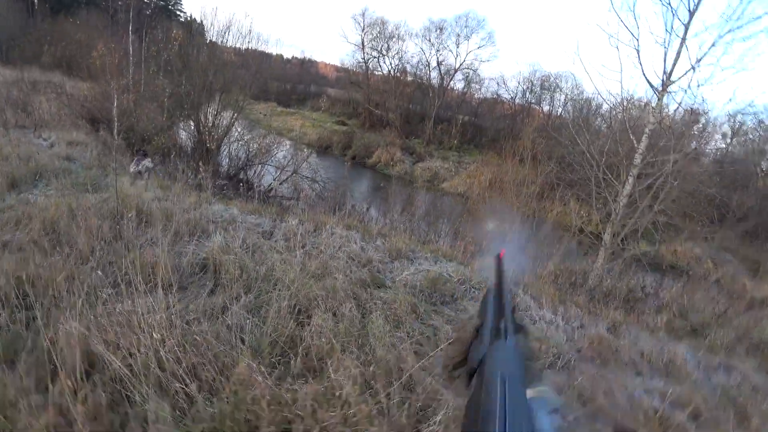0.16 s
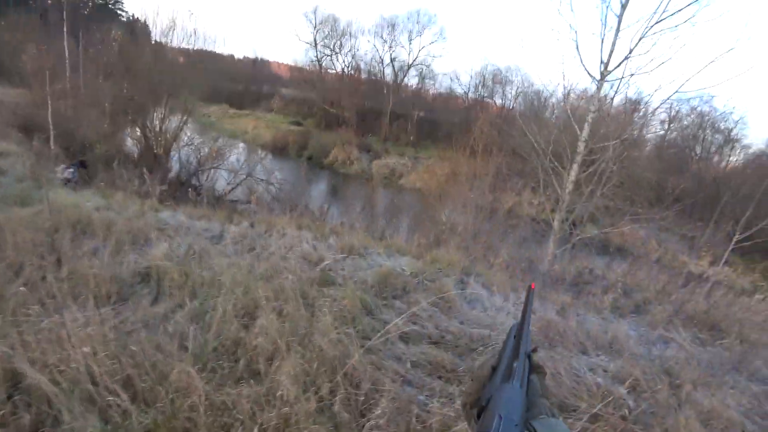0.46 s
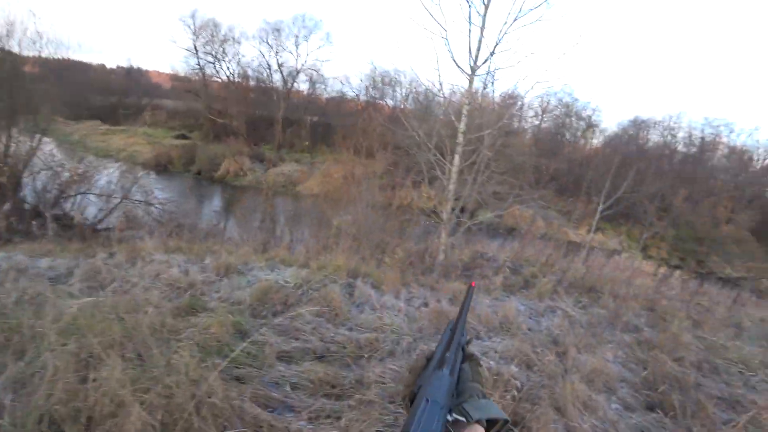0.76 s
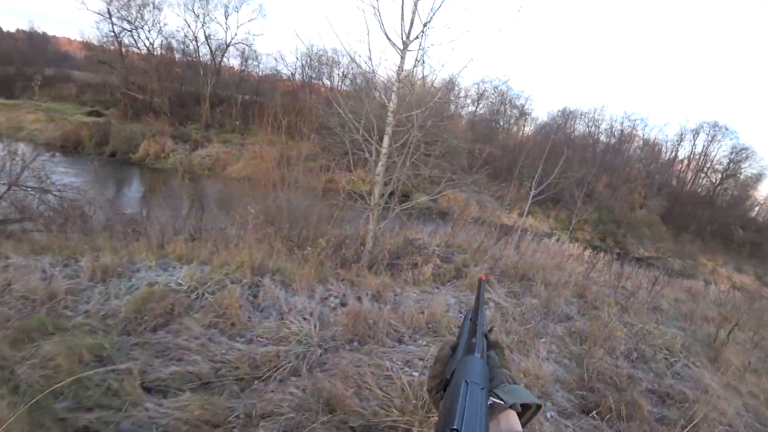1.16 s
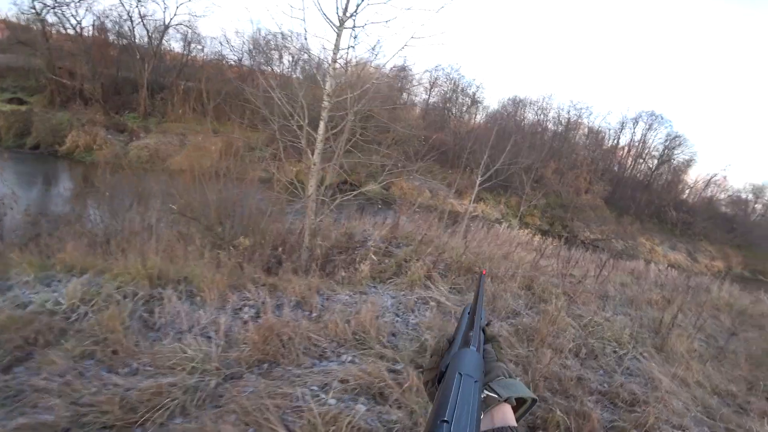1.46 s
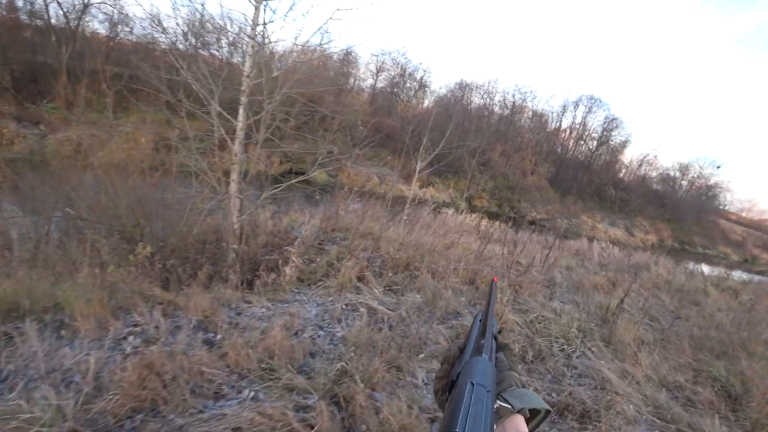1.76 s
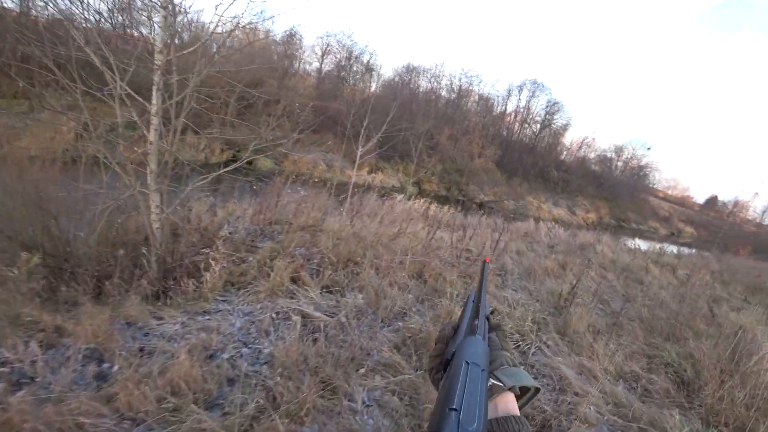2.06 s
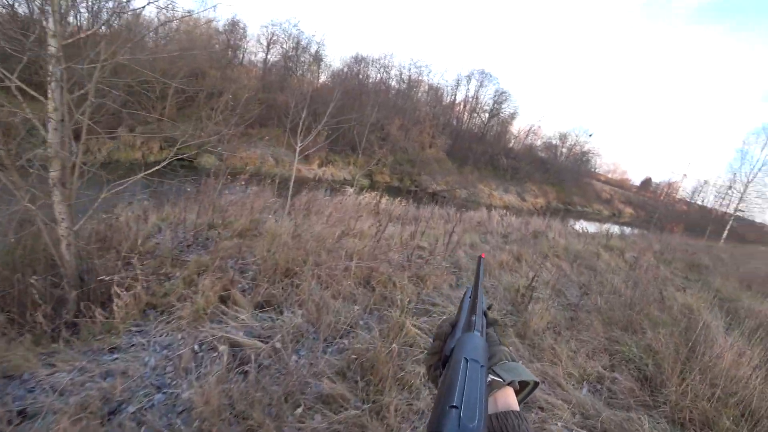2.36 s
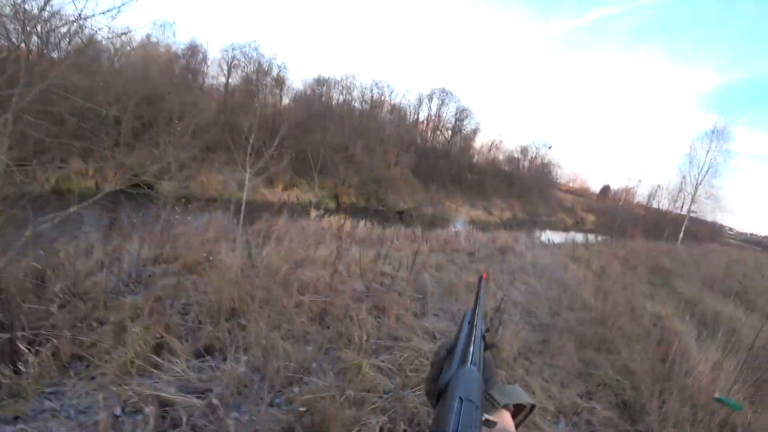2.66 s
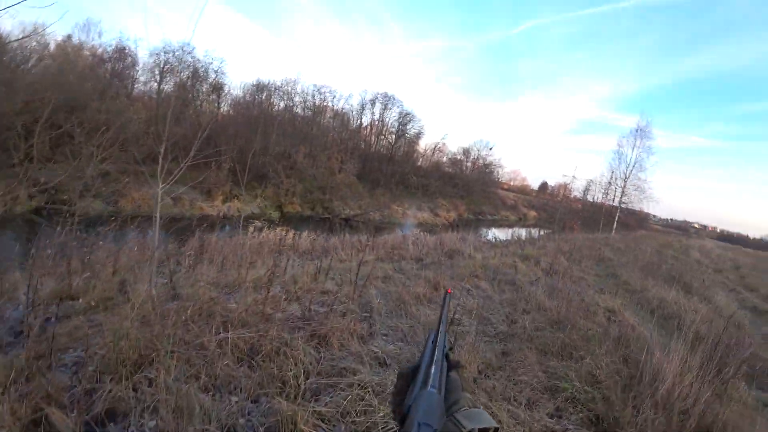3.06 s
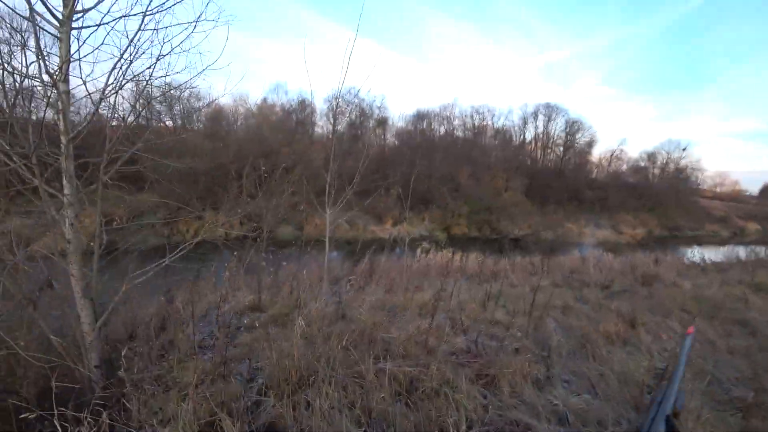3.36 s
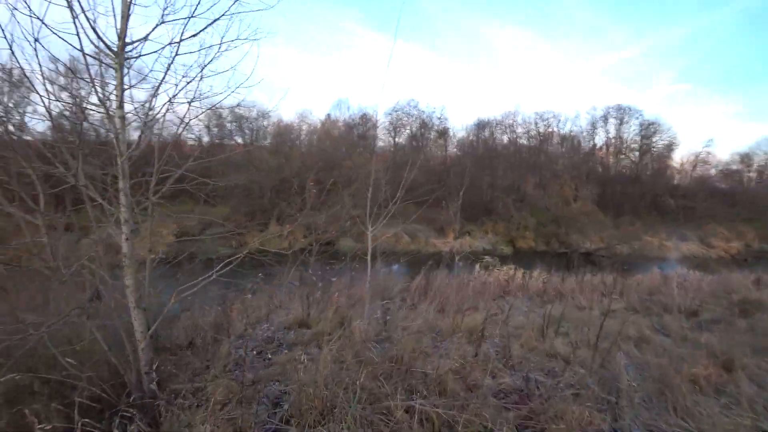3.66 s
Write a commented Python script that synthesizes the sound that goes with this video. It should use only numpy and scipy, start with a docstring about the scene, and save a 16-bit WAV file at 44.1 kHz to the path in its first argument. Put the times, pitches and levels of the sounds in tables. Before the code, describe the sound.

A self-loading shotgun fires twice on a brushy river bank, echoes slapping back and fading.

```python
"""A self-loading shotgun fires twice on a brushy river bank, heard from the shooter's head.
Each blast is banded noise with one steep low pressure swing; the bolt clatters after it as bright cracks.
Banks and tree lines roll the shot back: single dull slaps over clumped grains that lose treble as they fade.
Small hard things tick, filtered grains make clothing rustle over a faint hiss,
and low noise, partly opposed between the two microphones, makes the light wind buffet."""
import sys
import numpy as np
from scipy import signal
from scipy.io import wavfile
from scipy.ndimage import uniform_filter1d

SR = 44100
rng = np.random.default_rng(int(sys.argv[2]) if len(sys.argv) > 2 else 0)


def decibels_to_gain(level_db):
    """Convert a level in decibels to a linear amplitude gain (20 dB per decade)."""
    exponent = np.asarray(level_db, float) / 20
    return 10 ** exponent


def dump_mix(stems):
    """Bounce the given channels to the path in sys.argv[1] as a 16-bit WAV at rate SR."""
    frames = np.atleast_2d(stems).T  # one column per channel
    limited = np.clip(frames, -1, 1)  # hard clip at full scale
    pcm = np.round(limited * 32767).astype(np.int16)
    wavfile.write(sys.argv[1], SR, pcm)


N = 167580  # samples, 3.8 s

# The two shots. Each row: blast start in seconds, blast level in dB, low thump start in seconds,
# thump level in dB.
SHOTS = [(0.2152, -19.5, .2272, -4.5), (2.493, -19.5, 2.5055, -3)]
# Gas jet and gun noise by band. Each row: low edge in Hz, high edge in Hz, level in dB relative to the shot,
# hold in seconds, 60 dB decay time in seconds.
BLAST_BANDS = [(90, 255, -8.5, 0.031, 0.25), (280, 690, 1.5, 0.0079, 0.19), (1220, 2490, 3.5, 0.0079, 0.2),
               (3860, 9780, 8.5, 0.0068, 0.32), (8040, 15900, 5.5, 0.0056, 0.48)]
# Bolt and shell. Each row: start in seconds, level in dB, 60 dB decay time in seconds.
CLACKS = [(.2500, -7.5, .025), (.2538, -6, .008), (.2635, -9, .025), (.2722, -8, 0.02),
          (.2752, -8.5, 0.035), (.3072, -6.5, 0.04), (.3120, -9, 0.025), (2.556, -12, 0.03),
          (2.562, -12, 0.03), (2.5915, -8, 0.02), (2.598, -9, .015), (2.6022, -7, 0.03),
          (2.6068, -8, 0.035)]
# Tone of steel on steel. Each row: frequency in Hz, spectrum level in dB per Hz (above 0 counts as 0).
CLACK_TONE = [(180, -51), (300, -17), (552, -12), (1580, -7), (2830, 4), (4600, 10), (5050, -4), (6640, 7),
              (10500, -5.5), (11500, -2), (15000, -49)]
# Single strong returns from banks and trunks; the last row is instead the low knock under the tick at 3.587 s.
# # Each row: start in seconds, level in dB, centre in Hz, level of the brighter scatter in dB relative to the
# dull cycles.
SLAPS = [(0.359, -18, 620, -17), (0.419, -18.5, 626, 1), (0.464, -9.5, 664, -22), (0.487, -5.5, 474, -14),
         (0.534, -7.5, 716, -17), (0.651, -11.5, 362, -9), (0.703, -9, 375, -30), (0.7285, -16.5, 610, -5),
         (0.7545, -19, 600, -4), (0.876, -14.5, 617, -17), (0.908, -10.5, 550, -21),
         (0.938, -9.5, 507, -25), (0.975, -15, 440, -26), (1.5953, -16, 397, -24.5),
         (2.821, -6.5, 432, -7.5), (2.913, -11.5, 652, -28), (3.068, -19, 1596, -3), (3.108, -19, 1100, -2),
         (3.181, -14.5, 395, -10), (3.222, -15.5, 630, -14), (3.241, -13, 435, -13),
         (3.284, -14, 584, -11.5), (3.324, -13.5, 492, -27), (3.434, -24, 724, -21), (3.452, -17, 600, -20),
         (3.587, -24.5, 525, -6.5)]
# Rolling echo, one list per shot. Each row: time in seconds, body level in dB, middle level in dB,
# treble level in dB.
ROLL = [
    [(.27, -60, -48, -61), (.35, -32, -37, -32), (.365, -14.5, -23.5, -21), (.40, -25.5, -29, -26.5),
     (.42, -23, -23.5, -22), (.53, -21, -22, -25), (.6, -26.5, -24, -28.5), (.69, -27.5, -29, -36.5),
     (.735, -19.5, -21.5, -33), (.77, -25.5, -26, -28.5), (.85, -29, -33, -42), (.97, -24, -29.5, -40),
     (1.0, -25, -34, -44)],
    [(2.55, -38, -51, -39), (2.62, -46.5, -40.5, -37), (2.67, -24, -21, -22), (2.81, -21, -21.5, -25),
     (2.865, -25, -22, -27), (2.885, -33, -30.5, -30.5), (2.92, -21, -22.5, -32), (2.94, -32.5, -31.5, -36),
     (3.05, -35.5, -30.5, -46.5), (3.07, -40, -31, -41.5), (3.16, -30, -34, -40.5), (3.2, -30, -33, -42.5),
     (3.29, -24.5, -33, -47.5), (3.35, -29.5, -35, -50), (3.42, -32, -38, -50.5), (3.47, -31, -37.5, -63),
     (3.53, -30, -36.5, -55), (3.57, -36, -41, -62), (3.66, -35.5, -41, -61)],
]
# The far, dull remainder of the roll, in stretches. Each row: time in seconds, body level in dB,
# middle level in dB.
FAR_ROLL = [
    [(0, -39, -52), (.22, -42.5, -64)],
    [(1.0, -28, -32), (1.07, -29.5, -34), (1.22, -30, -37), (1.28, -37, -39.5), (1.58, -34.5, -42.5),
     (1.8, -40, -49), (2.1, -44, -45.5), (2.24, -45.5, -52), (2.34, -47, -55.5), (2.4, -46.5, -48.5),
     (2.5, -38, -39)],
    [(3.66, -34.5, -43), (3.8, -43.5, -42)],
]
# A deep return of the first shot. Each row: time in seconds, level in dB.
BOOM = [(.62, -58), (.67, -37), (.72, -28.5), (.8, -25.5), (.86, -36)]
# Tones of the roll's three layers. Each row: frequency in Hz, spectrum level in dB per Hz (above 0 counts as 0).
BODY_TONE = [(88, -35), (150, -20.5), (198, -13), (312, -3.5), (459, -0.5), (636, 0.5), (1500, -13.5),
             (1950, -26)]
MIDDLE_TONE = [(710, -4.5), (1200, -5), (1550, -4.5), (2050, -8), (4500, -21), (5850, -31), (9900, -120)]
TREBLE_TONE = [(2350, 2), (4000, 0.5), (7690, -3), (10400, -15), (11200, -12.5), (11500, -68)]
# Small dry ticks. Each row: start in seconds, level in dB, centre in Hz.
TICKS = [(.6442, -7, 6000), (.6575, -18, 4440), (.7283, -15, 6500), (.7490, -7, 6000), (.7648, -10.5, 4200),
         (.787, -17, 7500), (.7905, -8, 5400), (1.7175, -25.5, 3600), (2.087, -26, 5960),
         (2.450, -27, 3300), (2.461, -30, 4200), (3.5870, -20, 5600), (3.6130, -29, 6000)]
# Strokes of cloth. Each row: start in seconds, length in seconds, level in dB.
CLOTH_STROKES = [(0, 0.25, -54.5), (0.789, 0.041, -34.5), (0.887, 0.35, -39.5), (1.055, 0.54, -46.5),
                 (1.437, 0.21, -41.5), (1.398, 0.8, -52.5), (2.95, 0.95, -54.5), (1.886, 0.28, -40.5),
                 (1.98, .3, -48), (2.329, 0.26, -42.5), (3.633, 0.23, -43)]
# Tone of the cloth. Each row: frequency in Hz, spectrum level in dB per Hz.
CLOTH_TONE = [(1290, -56), (2200, -14), (3340, -3.5), (4550, -5), (6510, -1.5), (11000, -8.5), (14300, -58)]
# Course of the wind. Each row: time in seconds, level in dB, left over right in dB,
# opposed part in dB relative to the shared part.
WIND = [(0, -46, 3, -18), (.2, -38.5, 1, -27), (.28, -44, 0, -32), (.53, -39.5, -2, -17), (.6, -34, 3, -18),
        (.85, -36, -1, -16), (.97, -29.5, 5.5, -14), (1.1, -38, 2, -20), (1.34, -29.5, 3, -8),
        (1.7, -33, 2.5, -8), (1.9, -29, 4, 5.5), (2.12, -37, 7, -7), (2.27, -30, 2, -7),
        (2.45, -33, 2.5, -2), (2.57, -45, 0, -12), (3.05, -38, 3.5, -34), (3.2, -34.5, 1, -13),
        (3.35, -47, 0, -18), (3.7, -46.5, 4, -22), (3.8, -32.5, 2, -18)]
# Tones of the wind's shared and opposed parts. Each row: frequency in Hz, spectrum level in dB per Hz
# (above 0 counts as 0).
WIND_TONE = [(8.8, -42), (15, -9.5), (29, -5), (86, -10), (133, -17), (225, -29.5), (400, -29.5),
             (520, -39), (880, -120)]
WIND_OPPOSED_TONE = [(8.8, -53), (30, -20), (110, 2.5), (162, -4), (231, -11.5), (353, -18.5), (520, -16),
                     (880, -120)]

THUMP_HZ, THUMP_T60_S = 330, .015
HAMMER_LEAD_S, HAMMER_DB, HAMMER_T60_S = .0047, -14, .02
SLAP_T60_S = .036
TICK_T60_S, TICK_WIDTH = .009, 1.5  # width: ratio of each band edge to the centre
CONTACT_S = .0006
CRACKLE_DB = -11  # relative to the rubbing
HISS_DB = -61


def shot(start_s, db, thump_s, thump_db):
    """Hammer click, a ragged gas burst whose bass swells late, and one steep pressure swing."""
    out = np.zeros((2, N))
    t = np.arange(SR // 2) / SR
    add(out, start_s - HAMMER_LEAD_S, clack(HAMMER_DB, HAMMER_T60_S))

    ragged = evened(lumps(2.0, len(t), 50))
    noise = pair(*rng.standard_normal((2, len(t))), 0.66) * ragged
    bass_swell = np.minimum(t / (thump_s - start_s), 1) ** 2
    burst = np.zeros((2, len(t)))
    for low_hz, high_hz, band_db, hold_s, t60_s in BLAST_BANDS:
        decay = decibels_to_gain(db + band_db - 60 * np.maximum(t - hold_s, 0) / t60_s)
        swell = bass_swell if high_hz < THUMP_HZ * 4 else 1
        burst += evened(band(noise, low_hz, high_hz)) * swell * decay
    add(out, start_s, np.minimum(t / .0015, 1) * burst)  # 1.5 ms rise

    swing = np.cos(2 * np.pi * THUMP_HZ * t) * decibels_to_gain(-60 * t / THUMP_T60_S)
    swing *= np.minimum(t / .00015, 1)
    add(out, thump_s, pan(6.0) * decibels_to_gain(thump_db) * swing)
    return out


def clack(db, t60_s):
    """Steel on steel: a short bright crack of filtered chatter."""
    chatter = struck(np.arange(3000) / SR, t60_s, 0.64)
    return pan(-1.5) * decibels_to_gain(db) * peaked(colour(chatter, CLACK_TONE))


def struck(t, t60_s, same):
    """Noisy chatter that builds while the contact closes, then dies exponentially."""
    noise = pair(*rng.standard_normal((2, len(t))), same)
    rise = np.minimum(t / CONTACT_S + .2, 1)  # starts at a fifth of full strength
    return noise * decibels_to_gain(-60 * t / t60_s) * rise


def slap(db, hz, bright_db):
    """One strong return, or a low knock: a few dull cycles with a puff of brighter scatter."""
    t = np.arange(3000) / SR
    overtone = np.sin(2 * np.pi * (1.7 * hz * t + rng.random()))
    cycles = np.sin(2 * np.pi * hz * t) + 0.2 * overtone
    noise = pair(*rng.standard_normal((2, len(t))), 0.99)
    puff = evened(band(band(noise, 520, 3200), 510, 6100))
    envelope = decibels_to_gain(db - 60 * t / SLAP_T60_S) * np.minimum(t / .001, 1)
    return pan(1.5) * envelope * (cycles + decibels_to_gain(bright_db) * puff)


def roll():
    """Countless small returns from brush, trees and banks, arriving in clumps."""
    clumps = lumps(1.26, N, 500, 300)
    body = evened(colour(grains(700, 0.5, 0.92) * clumps, BODY_TONE))
    middle = evened(colour(grains(4000, 1.5, 0.71) * clumps, MIDDLE_TONE))
    treble = evened(colour(grains(8700, 1, 0.72) * clumps, TREBLE_TONE))
    deep = evened(band(band(grains(1200, 1.5, 1.0), 158, 332), 158, 332))
    far_body = evened(band(body, 60, 1050))

    out = level([BOOM], column=1) * deep
    out += level(FAR_ROLL, column=1) * far_body
    out += level(ROLL, column=1) * body
    out += level(ROLL + FAR_ROLL, column=2) * middle
    out += level(ROLL, column=3) * treble
    return pan(1.26) * out


def tick(db, hz):
    """A small hard snap that rings around one pitch, over a weaker wide edge."""
    t = np.arange(3000) / SR
    snap = struck(t, TICK_T60_S, 0.7)
    ring = np.sin(2 * np.pi * hz * t) * decibels_to_gain(-60 * t / TICK_T60_S) * np.minimum(t / CONTACT_S, 1)
    core = peaked(band(snap, hz / TICK_WIDTH, hz * TICK_WIDTH))
    edge = peaked(band(snap, hz / 3, hz * 2))
    return decibels_to_gain(db) * peaked(core + .5 * ring + .5 * edge)


def rustle():
    """Cloth rubbing and crackling: dense fine grains and sparse uneven ones, swelling in strokes."""
    power = np.zeros((1, N))  # overlapping strokes add as power
    for start_s, length_s, db in CLOTH_STROKES:
        swell = signal.windows.tukey(round(length_s * SR), 1.0)[None]  # swells and fades throughout
        add(power, start_s, decibels_to_gain(2 * db) * swell ** 2)
    rub = evened(grains(9000, 2.5, 0.82))
    crackle = evened(grains(250, 4.5, .5))
    cloth = evened(colour(rub + decibels_to_gain(CRACKLE_DB) * crackle, CLOTH_TONE))
    return lumps(1.2, N, 900, 500) * np.sqrt(power) * cloth


def hiss():
    """The faint hiss of the open air: steady wide noise."""
    noise = pair(*rng.standard_normal((2, N)), 0.63)
    return decibels_to_gain(HISS_DB) * evened(band(noise, 1500, 12000))


def wind():
    """Lumpy low buffeting: turbulent pressure noise, partly opposite in the two microphones."""
    shared_noise, opposed_noise = rng.standard_normal((2, 1, N))
    shared = evened(colour(shared_noise * lumps(2.0, N, 1500), WIND_TONE))[0]
    opposed = evened(colour(opposed_noise * lumps(2.0, N, 1500), WIND_OPPOSED_TONE))[0]
    opposed = level([WIND], column=3) * opposed
    time_s, _, lean_db, _ = np.transpose(WIND)
    lean = pan(np.interp(np.arange(N) / SR, time_s, lean_db))
    return level([WIND], column=1) * lean * np.array([shared + opposed, shared - opposed])


def grains(per_s, spread_db, same):
    """Scattered clicks of uneven size and random sign, in two streams blended to a given likeness."""
    size = decibels_to_gain(spread_db * np.minimum(rng.exponential(1, (2, N)), 5))
    size *= rng.choice([-1., 1.], (2, N))
    return pair(*(size * (rng.random((2, N)) < per_s / SR)), same)


def lumps(depth_db, length, *smooth_samples):
    """Random gain that wanders around 0 dB by depth_db rms, slower with longer smoothing."""
    wander = rng.standard_normal(length)
    for size in smooth_samples:
        wander = uniform_filter1d(wander, size=size)
    return decibels_to_gain(depth_db * evened(wander))


def level(tables, column):
    """Gain over time from stretches of a dB curve, silent between them."""
    t, out = np.arange(N) / SR, np.zeros(N)
    for rows in map(np.array, tables):
        out += decibels_to_gain(np.interp(t, rows[:, 0], rows[:, column], -140, -140))
    return uniform_filter1d(out, size=400)


def colour(x, points):
    """Minimum-phase filter from a spectrum table, kept between -90 and 0 dB."""
    hz = np.abs(np.fft.fftfreq(8192, 1 / SR))
    point_hz, point_db = np.transpose(points)
    db = np.interp(np.log(hz + 1), np.log(point_hz + 1), point_db, -90, -90)
    log_gain = np.log(decibels_to_gain(np.clip(db, -90, 0)))
    phase = -signal.hilbert(log_gain).imag
    taps = np.fft.ifft(np.exp(log_gain + 1j * phase)).real[:4096]
    return signal.oaconvolve(x, taps[None], axes=1)[:, :x.shape[1]]


def band(x, low_hz, high_hz):
    """Butterworth band-pass."""
    return signal.sosfilt(signal.butter(2, [low_hz, high_hz], "band", fs=SR, output="sos"), x)


def pair(a, b, same):
    """Left and right with a given likeness, from two independent signals."""
    shared, opposed = np.sqrt(1 + same) * a, np.sqrt(1 - same) * b
    return np.array([shared + opposed, shared - opposed]) / np.sqrt(2)


def pan(db):
    """Left and right gains for a left-over-right difference in dB."""
    return decibels_to_gain(np.array([db, -db]) / 2).reshape(2, -1)


def evened(x):
    """Scales to rms 1."""
    return x / np.sqrt(np.mean(x ** 2) + 1e-20)


def peaked(x):
    """Scales to peak 1."""
    return x / np.abs(x).max()


def add(mix, start_s, sound):
    """Mixes a sound in at a time, cut off at the end of the mix."""
    part = mix[:, round(start_s * SR):][:, :sound.shape[1]]
    part += sound[:, :part.shape[1]]


def scene():
    """Shots, clatter, echoes, ticks, cloth, air hiss and wind together."""
    mix = sum(shot(*row) for row in SHOTS)
    mix += roll() + rustle() + hiss() + wind()
    for rows, source in ((CLACKS, clack), (SLAPS, slap), (TICKS, tick)):
        for start_s, *settings in rows:
            add(mix, start_s, source(*settings))
    return mix


def roll_off(x):
    """The treble ends steeply here."""
    return signal.sosfilt(signal.butter(12, 12340, fs=SR, output="sos"), x)


def record(dry):
    """Soft overload rounds off the peaks, then a steep low-pass at 11 kHz limits the band."""
    soft = 0.86 * np.tanh(dry / 0.8)
    low_pass = signal.firwin(301, 11010, window=("kaiser", 9), fs=SR)
    limited = signal.oaconvolve(soft, low_pass[None], "same")
    return roll_off(limited)


dry = scene()
out = record(dry)
dump_mix(out)
```